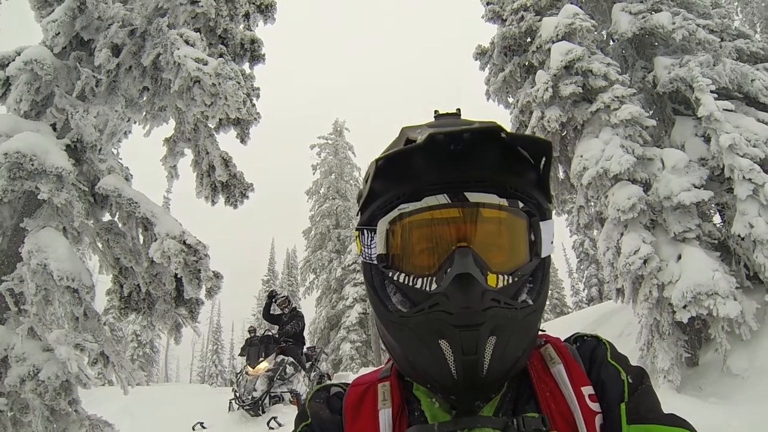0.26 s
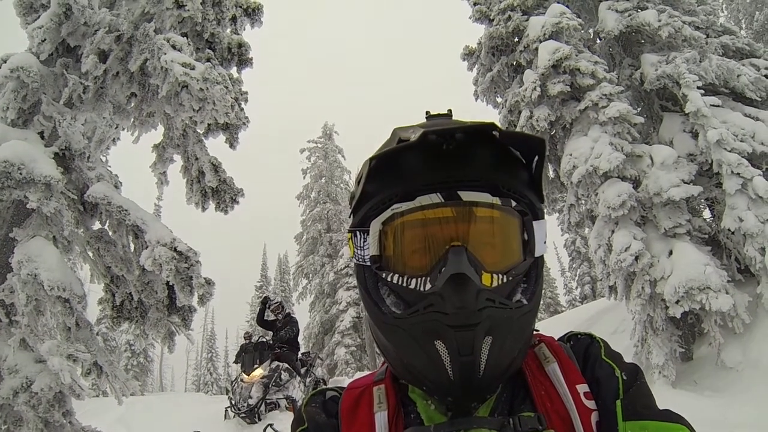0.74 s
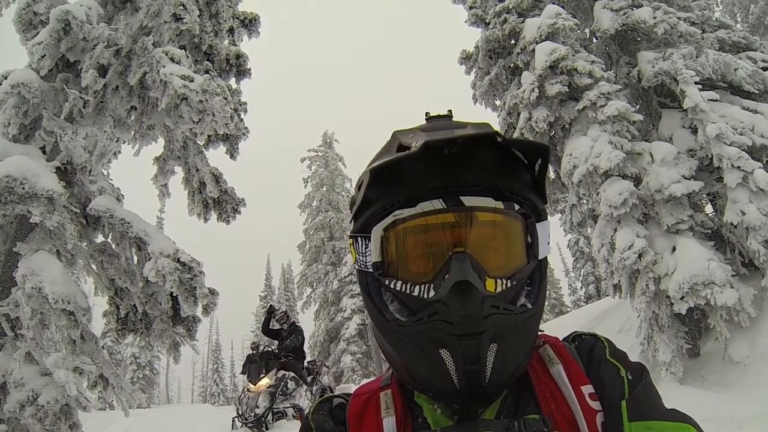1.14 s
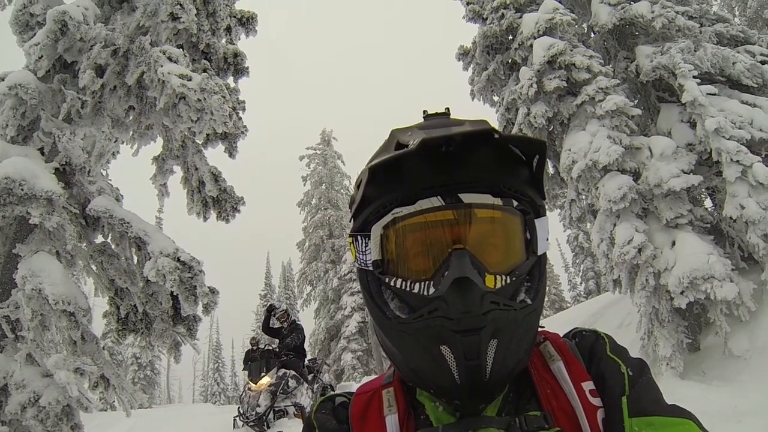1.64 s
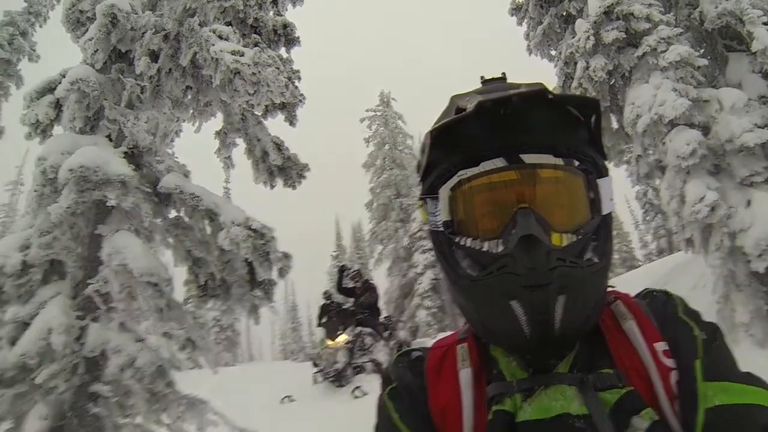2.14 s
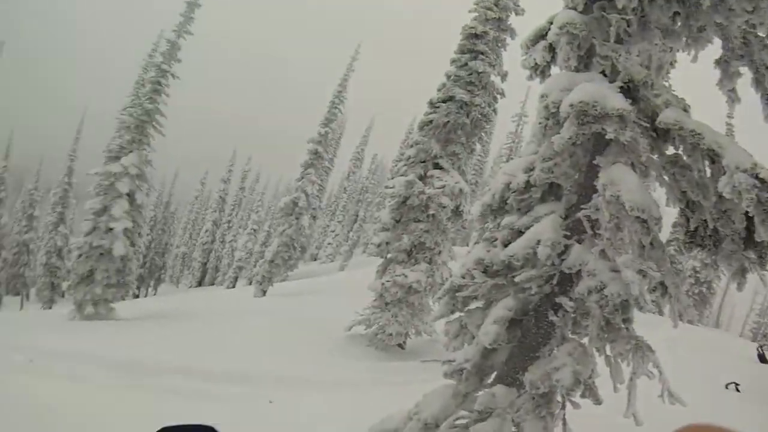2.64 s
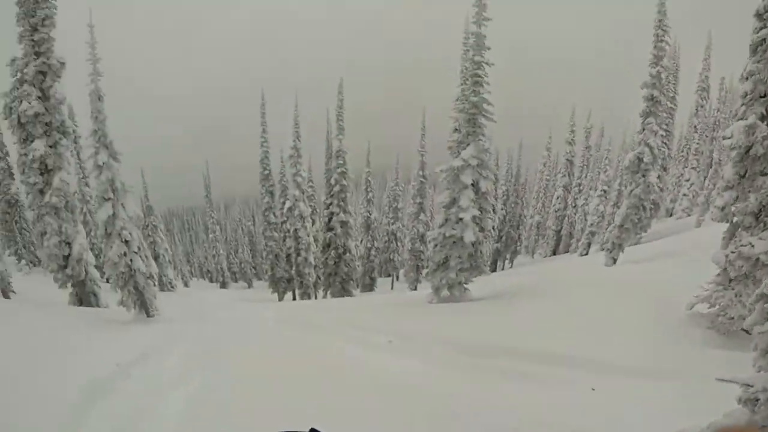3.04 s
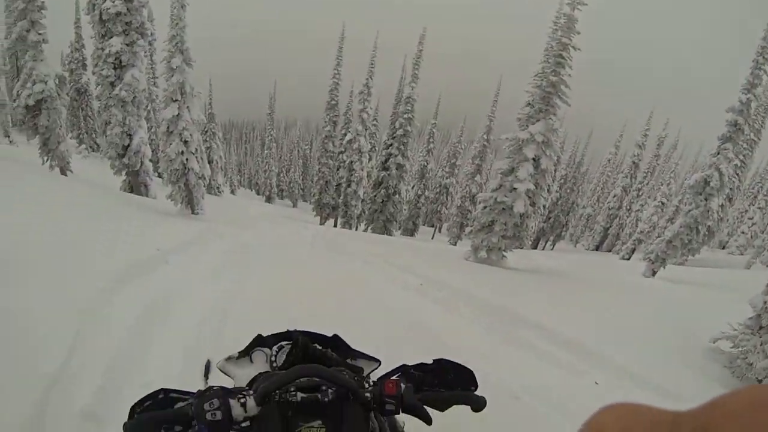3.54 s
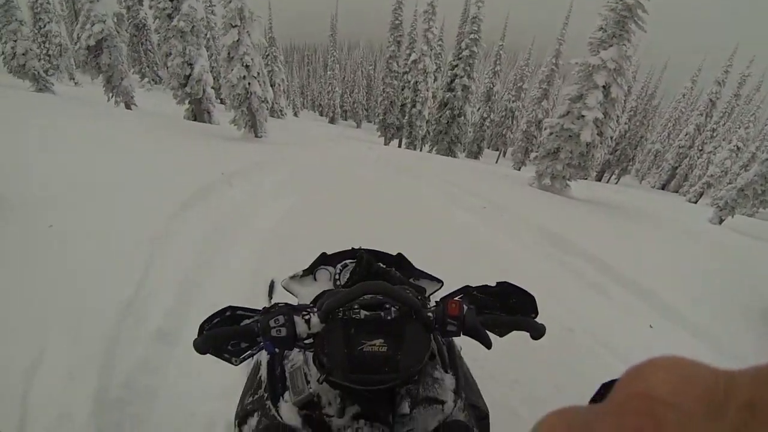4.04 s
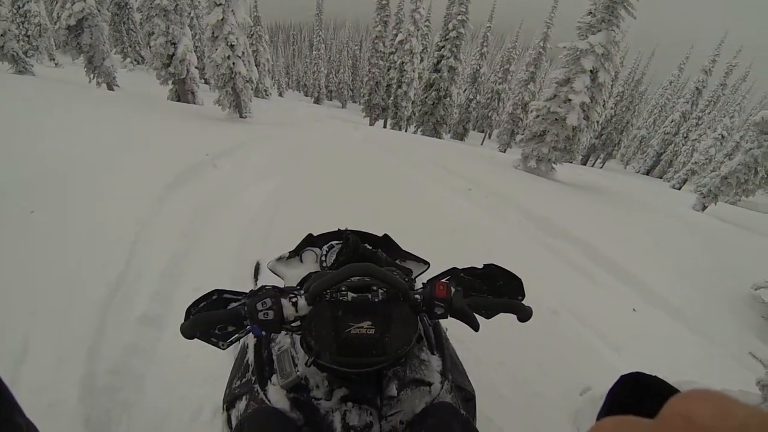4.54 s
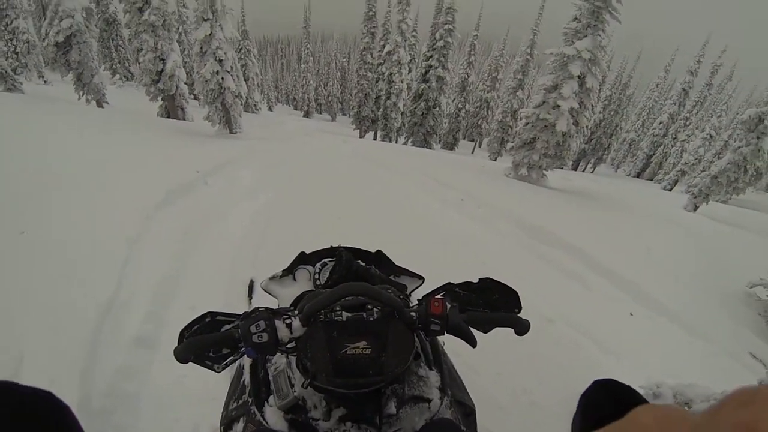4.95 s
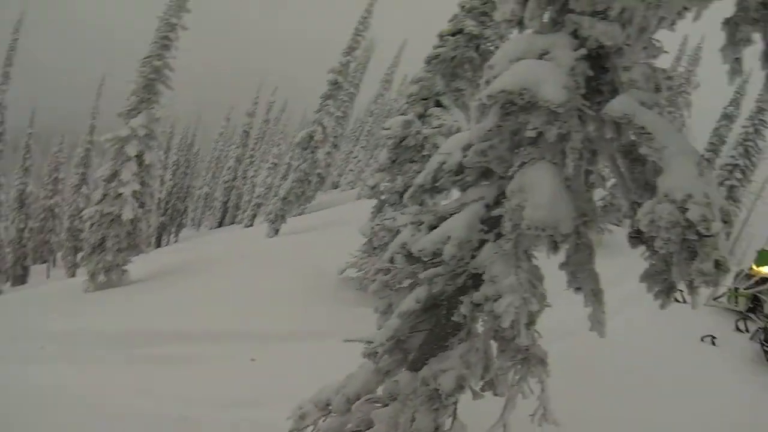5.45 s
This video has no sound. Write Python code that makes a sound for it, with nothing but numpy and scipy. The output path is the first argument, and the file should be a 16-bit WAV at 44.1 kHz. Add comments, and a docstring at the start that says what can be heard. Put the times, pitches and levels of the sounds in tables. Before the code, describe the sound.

A snowmobile idles with an uneven putter while close scrapes, clicks and hard knocks come from fingers handling the microphone.

```python
"""A two-stroke snowmobile putters at idle in deep snow, now and then firing fully; its block whirs.
Each firing is a short exhaust puff over a pipe hum. Heard from a small cased camera in the rider's hand:
mostly from 2 s on, fingers scrape and click on the case and thump its mount, hard enough to overload.
The camera's gain, a set curve, rises at the start, ducks after hard knocks and creeps back,
taking engine and background with it."""
import sys
import numpy as np
from scipy import signal
from scipy.fft import rfft, irfft
from scipy.io import wavfile
from scipy.ndimage import uniform_filter1d

SR = 44100
rng = np.random.default_rng(int(sys.argv[2]) if len(sys.argv) > 2 else 0)


def master_out(mix):
    """Clip the mix to full scale and print it as 16-bit PCM to the path in sys.argv[1]."""
    frames = np.transpose(np.atleast_2d(mix))
    ceiling = np.clip(frames, -1, 1)
    pcm = np.round(ceiling * 32767).astype(np.int16)
    wavfile.write(sys.argv[1], SR, pcm)


N = 250834
FIRING_HZ = 52.52

# camera gain on engine and background, ducks after hard knocks: t/s, level/dB
CAMERA_GAIN = [(0, -54), (.04, -49), (.055, -14), (.3, -11.5), (.5, -8), (.75, -5), (.95, -2), (2.28, -1.5),
               (2.33, 1), (2.4, -2.5), (2.7, 0.5), (3.31, -3), (3.35, -17), (3.47, -11.5), (3.6, -15),
               (3.65, -12), (3.86, -29), (3.9, -26), (4.0, -11), (4.13, -11.5), (4.22, -16), (4.29, -14.5),
               (4.45, -10.5), (4.84, -8), (4.9, -20.5), (5.02, -22), (5.12, -14.5), (5.3, -11.5),
               (5.69, -7.5)]
# full firings: t/s, level/dB
FULL_FIRINGS = [(.648, -29.5), (.743, -27.5), (.762, -31), (0.836, -26.5), (0.916, -31), (.935, -26),
                (0.953, -25.5), (1.071, -24), (1.126, -24), (1.184, -26), (1.26, -28), (1.277, -25.5),
                (1.335, -28), (1.393, -26.5), (1.449, -24), (1.544, -26), (1.564, -26), (1.638, -28),
                (1.695, -30), (1.714, -25), (1.789, -27), (1.829, -28), (1.886, -27.5), (1.905, -26),
                (1.98, -27), (2.06, -29.5), (2.077, -22), (2.134, -26), (2.21, -28), (2.463, -40),
                (2.497, -29), (2.629, -27.5), (2.707, -22), (2.861, -25.5), (2.937, -26.5), (3.037, -22.5),
                (3.13, -29), (3.207, -28.5), (3.263, -28)]
# pipe hum: multiple of firing rate, level/dB
PIPE_HARMONICS = [(2, -51), (3, -38.5), (4, -37), (5, -49), (6, -53.5)]
# engine clatter: f/Hz, density/dB
WHIR_SPECTRUM = [(250, 0.5), (440, -5), (620, -15), (1050, -13.5), (1300, -5.5), (1500, -3.5), (1800, -10),
                 (2100, -15.5), (2800, -23), (3350, -27), (5500, -33.5), (6600, -40), (9500, -43.5),
                 (15000, -44.5)]
# ringing metal parts: f/Hz, width/Hz, gain/dB
METAL_MODES = [(1310, 70, -4.5), (1470, 70, -7), (1620, 170, -9), (3210, 110, 1.5), (4000, 77, -13),
               (4910, 89, -4)]
# engine vibration through the rider: t/s, level/dB
SHAKE_LEVEL = [(0, -77), (3.2, -53), (3.7, -47.5), (4.0, -47.5), (4.7, -43), (5.05, -42.5), (5.2, -40),
               (5.29, -36), (5.345, -19.5), (5.41, -29.5), (5.47, -35), (5.52, -27.5), (5.62, -32.5),
               (5.69, -37.5)]
# finger slides: start/s, hardest/s, end/s, rub/dB, rasp/dB, hiss/dB, rumble/dB
SLIDES = [(0.048, 0.047, 0.07, -51, -51.5, -63, -41), (0.075, 0.095, 0.15, -53.5, -68, -84, -45.5),
          (0.272, 0.357, 0.44, -54, -59, -82, -43), (0.414, 0.433, 0.43, -55, -67, -83, -26.5),
          (2.06, 2.08, 2.147, -29.5, -42, -45, -37), (2.155, 2.16, 2.26, -34, -52, -49.5, -31),
          (2.201, 2.214, 2.326, -33, -38, -48, -31), (2.258, 2.307, 2.314, -22, -27, -46, -26),
          (2.358, 2.38, 2.53, -31, -55, -86, -36), (2.437, 2.476, 2.52, -26, -30.5, -51, -38),
          (2.474, 2.506, 2.445, -28, -48, -41, -41), (2.512, 2.533, 2.55, -37, -43, -48.5, -29.5),
          (2.546, 2.58, 2.646, -25, -34.5, -46.5, -27), (2.651, 2.723, 2.704, -26.5, -41, -48.5, -47),
          (2.713, 2.76, 2.805, -24.5, -33.5, -41.5, -22.5), (3.313, 3.313, 3.343, -19, -22.5, -44, -32),
          (3.45, 3.454, 3.6, -55, -54.5, -81, -39.5), (3.526, 3.593, 3.68, -46.5, -45.5, -56.5, -43),
          (3.65, 3.68, 3.83, -50.5, -72, -61.5, -44), (3.762, 3.77, 3.753, -24.5, -30, -49, -32),
          (3.772, 3.847, 3.9, -43, -52.5, -62, -40), (3.935, 4.065, 4.05, -52, -54.5, -61, -40.5),
          (4.12, 4.15, 4.155, -36.5, -42, -55, -38), (4.144, 4.162, 4.21, -30, -35.5, -41.5, -16.5),
          (4.31, 4.32, 4.39, -24.5, -27.5, -43, -18), (4.376, 4.399, 4.425, -34, -45, -49.5, -25.5),
          (4.454, 4.493, 4.5, -49, -49, -58.5, -31.5), (4.573, 4.605, 4.62, -44, -40, -51, -35),
          (4.69, 4.707, 4.8, -54, -64, -65.5, -35.5), (4.738, 4.772, 4.81, -48.5, -49, -68, -48),
          (4.827, 4.856, 4.96, -58, -63.5, -56.5, -37.5), (4.863, 4.883, 4.904, -23.5, -26, -42, -15),
          (5.08, 5.247, 5.38, -60, -55, -62, -37), (5.338, 5.355, 5.43, -41.5, -49, -56.5, -38)]
# rubbed wall, skin rasp, fine hiss, sharp slips: f/Hz, density/dB
RUB_SPECTRUM = [(150, -3), (400, -13.5), (750, -21), (1150, -10), (1520, 4), (1800, -6.5), (2400, -21.5),
                (4000, -33.5), (15000, -57)]
RASP_SPECTRUM = [(900, -20), (1600, 1.5), (2000, 2.5), (2350, 2.5), (2650, -3.5), (3200, -6.5),
                 (3800, -29.5), (6000, -40.5), (15000, -51)]
HISS_SPECTRUM = [(1500, -19), (2800, 5), (3400, 4.5), (4300, -3), (5700, -4.5), (7500, -14.5),
                 (10000, -15.5), (13000, -22), (15500, -22)]
SIZZLE_SPECTRUM = [(700, -0.5), (1500, 9), (2500, 7.5), (4000, 0), (6000, -3), (8500, 1), (12000, -3.5),
                   (14000, -7), (15500, -18.5)]
# single resonances freed by the grip: start/s, end/s, f/Hz, width/Hz, level/dB
GRIP_SQUEAKS = [(0.076, .19, 2000, 490, -62), (0.415, 0.449, 2040, 384, -48.5),
                (0.43, 0.44, 1080, 774, -54), (2.258, 2.284, 3200, 600, -36),
                (2.355, 2.446, 1800, 467, -36), (2.474, 2.504, 5100, 900.6, -39.5),
                (2.57, 2.609, 1940, 450, -27), (3.314, 3.331, 2670, 795, -28.5),
                (3.544, 3.612, 5400, 700, -63.5), (4.366, 4.418, 6660, 684, -59),
                (4.37, 4.418, 3850, 500, -47), (4.387, 4.422, 973, 200, -37),
                (4.874, 4.893, 2570, 590, -23.5), (5.21, 5.237, 640, 120, -55), (5.311, 5.39, 640, 90, -47),
                (5.42, 5.511, 607, 59.2, -53), (5.44, 5.518, 413, 71.5, -53.5)]
# hard contacts: t/s, ring level/dB, ring f/Hz, crack level/dB, crack decay/ms
CONTACTS = [(.357, -43, 1620, -44, 0.74), (.431, -36, 1480, -63, 0.87), (1.444, -40, 1510, -31, 0.31),
            (2.069, -21.5, 1300, -27.5, 2.2), (2.164, -23.5, 1590, -31.5, 1), (2.269, -33, 1580, -30, 3.3),
            (2.294, -11.5, 1510, -46, 1.8), (2.305, -18, 1610, -33, 2.5), (2.312, -3.5, 1569, -13.5, 1.9),
            (2.463, -10, 1465, -24, 0.75), (2.587, -15, 1600, -26.5, 3.6), (2.709, -21, 1461, -42, 0.99),
            (2.762, -31, 1550, -22, 1.7), (3.316, -33, 1520, -26.5, 3.2), (3.332, -13, 760, -6, 0.98),
            (3.341, -37, 1670, -46, 0.91), (3.348, -34, 1500, -45, 0.79), (3.364, -42, 1500, -50, 1),
            (3.46, -39, 1600, -44, 1.8), (3.6235, -3.5, 1590, -21.5, 1.4), (3.763, -22.5, 1500, -31.5, 5.5),
            (3.773, -16.5, 1500, -30, 1.3), (3.871, -10.5, 1600, -32, 1.2), (3.875, -0.5, 1990, -8, 0.95),
            (3.8759, -1, 1484, -18, 1.94), (4.02, -34, 1540, -30, 1.33), (4.04, -35, 1450, -38, 1.02),
            (4.069, -35, 1520, -31, 1.4), (4.136, -34, 1388, -48, 1.6), (4.1594, -5.5, 1446, -21.5, 1.6),
            (4.18, -11.5, 1320, -19, 1.074), (4.362, -13.5, 1440, -40, 1.9), (4.402, -18, 1680, -30.5, 1.3),
            (4.811, -55, 1443, -40.5, 2.6), (4.865, -4.5, 1926, -14, 1.702),
            (4.8671, -1.5, 1530, -8.5, 0.85), (4.894, -6.5, 1335, -20.5, 1.4), (4.905, -40, 1500, -42, 1.8),
            (4.947, -3.5, 1480, -13.5, 1.9), (4.949, -22, 1491, -21.5, 1.2),
            (5.058, -42.5, 1470, -50, 1.22), (5.076, -41, 1460, -51, 1.1), (5.217, -35.5, 1417, -49, 1.6),
            (5.299, -42, 1713, -46, 2.2), (5.324, -31.5, 1670, -27, 1.94), (5.363, -32, 1471, -22.5, 0.43),
            (5.507, -39, 1530, -44, 1.6)]
# struck case: f/Hz, density/dB
CRACK_SPECTRUM = [(200, 2.5), (750, -3.5), (1500, -15.5), (2400, 0.5), (3100, -4.5), (3800, -7.5),
                  (4700, -14.5), (6000, -17), (8000, -25.5), (12000, -32), (15500, -50.5)]
# high case modes: f/Hz, width/Hz, gain/dB
CASE_MODES = [(732, 70, -4), (1940, 270, 0), (2430, 160, -2.5), (4860, 230, -4)]
# blunt blows on the case: t/s, level/dB
BLOWS = [(2.312, -25), (2.762, -12), (3.314, -14), (3.332, -7.5), (3.775, -17.5), (3.870, -28),
         (3.879, -16.5), (4.153, -21.5), (4.162, -13.5), (4.18, -32), (4.195, -19.5), (4.335, -23),
         (4.404, -24.5), (4.893, -0.5), (4.949, -8.5), (5.356, -28.5)]
# low modes of the case hollow: f/Hz, level/dB, t60/s
HOLLOW_MODES = [(196, 1.5, 0.038), (270, 1.5, .03), (413, -1, .018), (578, -9.5, 0.013), (1032, -2, 0.022)]
# bumps on the mount: t/s, signed amplitude, f/Hz, t60/s
MOUNT_BUMPS = [(2.312, 0.57, 43.3, 0.042), (2.596, -0.29, 25.2, 0.23), (2.762, 0.27, 55, 0.098),
               (3.320, 0.41, 60.4, 0.071), (3.3313, 1.77, 84.7, 0.037), (3.346, 0.15, 72, 0.15),
               (3.6255, -0.53, 96.3, 0.097), (3.707, 0.073, 84.9, 0.099), (3.773, 0.099, 129, 0.014),
               (3.810, 0.18, 103, 0.052), (3.868, -0.72, 93, 0.04), (3.881, -0.67, 112, 0.044),
               (4.150, -0.57, 72, 0.045), (4.160, 0.63, 67.1, 0.19), (4.197, 0.53, 85.1, 0.033),
               (4.322, 0.18, 27.8, 0.22), (4.336, -0.32, 59.53, 0.077), (4.581, 0.18, 35.5, .09),
               (4.616, .1, 79.4, 0.23), (4.811, -0.31, 74, 0.11), (4.888, -0.16, 126, 0.017),
               (4.8922, 0.56, 52.5, 0.098), (4.9028, -1.2, 107, 0.032), (4.952, -0.41, 102.6, 0.13),
               (5.147, -0.098, 70.02, 0.094), (5.462, 0.062, 30, 0.17), (5.526, -0.08, 65, 0.21)]


def undb(db):
    """dB to gain."""
    return 10 ** (np.asarray(db) / 20)


def clock():
    """Sample times in s."""
    return np.arange(N) / SR


def envelope(rows):
    """Gain along (t/s, level/dB) rows."""
    return undb(np.interp(clock(), *np.transpose(rows)))


def unit_rms(x):
    """Scale to rms 1."""
    return x / np.sqrt(np.mean(x ** 2))


def resonate(x, hz, width_hz):
    """One resonance, gain 1 at centre."""
    return signal.lfilter(*signal.iirpeak(hz, hz / width_hz, fs=SR), x)


def band(x, first_hz, second_hz):
    """Two (centre, width) resonances in series, rms 1."""
    return unit_rms(resonate(resonate(x, *first_hz), *second_hz))


def ringing(x, modes):
    """Input plus the modes it excites."""
    return x + sum(undb(db) * resonate(x, hz, width_hz) for hz, width_hz, db in modes)


def colour(x, spectrum, size=2048):
    """Minimum-phase filter of unit power, shaped by (f/Hz, density/dB) rows."""
    hz, db = np.transpose(spectrum)
    bins_hz = np.maximum(np.fft.rfftfreq(size, 1 / SR), 1)
    gain = undb(np.interp(np.log(bins_hz), np.log(hz), db)) * np.minimum(bins_hz / hz[0], 1)
    cepstrum = irfft(np.log(gain))
    cepstrum[1:size // 2] *= 2
    cepstrum[size // 2 + 1:] = 0
    response = irfft(np.exp(rfft(cepstrum)))
    return signal.fftconvolve(x, response / np.linalg.norm(response))[:N]


def wander(rate_hz):
    """Ramps between random values."""
    knots = rng.standard_normal(int(N / SR * rate_hz) + 2)
    return 0.91 * np.interp(clock() * rate_hz, np.arange(len(knots)), knots)


def slips(rate_hz, spread_db):
    """Random impulses of unequal size, rms 1."""
    sizes = undb(spread_db * np.minimum(rng.exponential(size=N), 4))
    return unit_rms((rng.random(N) < rate_hz / SR) * sizes * rng.standard_normal(N))


def pulses(times_s, sizes):
    """One impulse per time."""
    return np.bincount(np.clip(times_s * SR, 0, N - 1).astype(int), sizes, N)


def firings(jitter_s=0.00076):
    """Uneven firing times between the full firings, and the indices of the full ones."""
    marks_s = np.r_[0, [s for s, _ in FULL_FIRINGS], N / SR]
    turns = np.maximum(np.round(np.diff(marks_s) * FIRING_HZ), 1)
    count = np.r_[0, np.cumsum(turns)].astype(int)
    late_s = jitter_s * np.clip(rng.standard_normal(count[-1]), -2, 2)
    late_s[count[:-1]] = 0
    return np.interp(np.arange(count[-1]), count, marks_s) + late_s, count[1:-1]


def exhaust(times_s, full, gain, weak_db=-39, scatter_db=4, puff_hz=208, puff_s=0.0023,
            answer_db=-9, answer_s=0.01, waver_db=2):
    """The silencer rounds each firing to a puff, answered half a turn later; the pipe hums below."""
    scatter = np.clip(rng.standard_normal((len(times_s), 2)), -2, 1.3).T
    weak, answer = undb(weak_db + scatter_db * scatter) * np.interp(times_s, clock(), gain)
    strength = weak.copy()
    strength[full] = undb([db - 1.5 for _, db in FULL_FIRINGS])
    kicks = pulses(times_s, strength) + pulses(times_s + answer_s, undb(answer_db) * answer)
    t = np.arange(-512, 513) / SR
    puff = np.exp(-((t - .001) / puff_s) ** 2) * np.cos(2 * np.pi * puff_hz * t)
    puffs = signal.fftconvolve(kicks, puff, "same")
    turn = np.interp(clock(), times_s, np.arange(len(times_s)))
    hum = sum(undb(db + waver_db * wander(14)) * np.cos(2 * np.pi * round(k) * turn)
              for k, db in PIPE_HARMONICS)
    # hum swells around each full firing
    surge = np.interp(clock(), times_s, uniform_filter1d(strength / weak, size=3)) ** 0.32
    return puffs + gain * surge / surge.mean() * hum


def whir(times_s, level_db=-43, flicker_db=1.94):
    """Pistons, clutch and fan: dense clatter, partly repeating each turn, rings metal parts."""
    smooth_s = uniform_filter1d(times_s, size=5, mode="nearest")
    turn = np.interp(clock(), smooth_s, np.arange(len(times_s)))
    one_turn = rng.standard_normal(int(SR / FIRING_HZ))
    repeating = one_turn[(turn % 1 * len(one_turn)).astype(int)]
    clatter = (rng.standard_normal(N) + repeating) * undb(flicker_db * wander(60))
    return undb(level_db) * unit_rms(ringing(colour(clatter, WHIR_SPECTRUM), METAL_MODES))


def shake(times_s, scatter=0.73, octave_db=-14, rumble_db=-4):
    """Firings rock the mount, resonant near twice their rate; the arm adds rumble."""
    kicks = pulses(times_s, 1 + scatter * rng.standard_normal(len(times_s)))
    hum = band(kicks, (106, 35), (120, 74))
    octave = band(kicks, (208, 40), (208, 100))
    rumble = band(rng.standard_normal(N), (29, 34), (32, 78))
    return envelope(SHAKE_LEVEL) * (hum + undb(octave_db) * octave + undb(rumble_db) * rumble)


def scrapes(rub_db=.5, rasp_db=-.5, judder_db=2, spread_db=2.5, sizzle_db=-1):
    """Skin sticks and slips on plastic: the wall rings, the surface rasps and hisses, the case drags."""
    t, force = clock(), np.zeros((4, N))
    for start_s, hardest_s, end_s, *levels_db in SLIDES:
        span = slice(int(start_s * SR), int(end_s * SR))
        press = np.interp(t[span], [start_s, hardest_s, end_s], [0, 1, 0])
        force[:, span] += undb(levels_db)[:, None] * (0.14 + 0.95 * press ** 1.35)
    rub, rasp, hiss, rumble = uniform_filter1d(force, size=90, axis=1)
    judder = undb(judder_db * wander(220))
    layers = ((undb(rub_db) * rub, RUB_SPECTRUM), (undb(rasp_db) * rasp, RASP_SPECTRUM),
              (hiss, HISS_SPECTRUM))
    friction = sum(gain * unit_rms(colour(judder * slips(3000, spread_db), spectrum))
                   for gain, spectrum in layers)
    # only a hard grip breaks loose in sharp slips
    grip = np.tanh(rub / undb(-25))
    sizzle = hiss * grip * unit_rms(colour(slips(860, 2.8), SIZZLE_SPECTRUM))
    drag = band(rng.standard_normal(N), (28, 60), (36, 120))
    return friction + undb(sizzle_db) * sizzle + rumble * drag


def squeaks():
    """Rapid slips briefly feed one case resonance."""
    out = np.zeros(N)
    for start_s, end_s, hz, width_hz, db in GRIP_SQUEAKS:
        squeak = band(slips(6000, 1.7), (hz, width_hz), (hz, 2 * width_hz))
        progress = np.clip((clock() - start_s) / (end_s - start_s), 0, 1)
        out += undb(db) * squeak * np.sin(np.pi * progress) ** .5
    return out


def clicks(swell_s=0.00085, tail_db=-27, tail_s=0.0035, crack_gain_db=2, contact_s=0.00045):
    """A brief crack rings the air in the case; the ring swells and dies."""
    ring, crack = np.zeros(N), np.zeros(N)
    t = np.arange(SR // 16) / SR
    swell = (t / swell_s * np.exp(1 - t / swell_s)) ** 1.17 + undb(tail_db) * np.exp(-t / tail_s)
    attack = 1 - np.exp(-t / contact_s)
    for start_s, ring_db, hz, crack_db, decay_ms in CONTACTS:
        span = slice(int(start_s * SR), int(start_s * SR) + len(t))
        ring[span] += undb(ring_db) * swell * np.sin(2 * np.pi * hz * t)
        grit = rng.standard_normal(len(t))
        crack[span] += undb(crack_db) * grit * attack * np.exp(-1000 * t / decay_ms)
    return ring + undb(crack_gain_db) * ringing(colour(crack, CRACK_SPECTRUM), CASE_MODES)


def knocks():
    """Blunt blows ring the hollow of the case."""
    t = np.arange(SR // 10) / SR
    ring = sum(undb(db - 60 * t / t60_s) * np.sin(2 * np.pi * hz * t) for hz, db, t60_s in HOLLOW_MODES)
    times_s, levels_db = np.transpose(BLOWS)
    return signal.fftconvolve(pulses(times_s, undb(levels_db)), ring / np.abs(ring).max())[:N]


def thumps(contact_s=0.00032):
    """The camera swings on its mount; tighter grip, higher note."""
    out, t = np.zeros(N), np.arange(SR // 7) / SR
    attack = 1 - np.exp(-t / contact_s)
    for start_s, swing, hz, t60_s in MOUNT_BUMPS:
        span = slice(int(start_s * SR), int(start_s * SR) + len(t))
        out[span] += swing * attack * undb(-60 * t / t60_s) * np.sin(2 * np.pi * hz * t)
    return out


def sway(level_db=-41, gust_db=3):
    """Soft rumble of air and the unsteady hand."""
    gusts = undb(level_db + gust_db * wander(2.4))
    return gusts * band(rng.standard_normal(N), (22, 33), (26, 110))


def whine(hz=11430, width_hz=260, burst_hz=60, level_db=-77):
    """Camera electronics whistle faintly in bursts."""
    gate = np.sin(2 * np.pi * burst_hz * clock()) > 0
    return undb(level_db) * band(gate * rng.standard_normal(N), (hz, width_hz), (hz, 2 * width_hz))


def scene():
    """Engine, handling, background. Mono and dry: snow swallows the echoes."""
    times_s, full = firings()
    gain = envelope(CAMERA_GAIN)
    engine = exhaust(times_s, full, gain) + gain * whir(times_s) + shake(times_s)
    handling = scrapes() + squeaks() + clicks() + knocks() + thumps()
    background = gain * (sway() + whine())
    return (engine + handling + background)[None]


def record(dry):
    """Overload on the hardest knocks, then a steep low-pass."""
    cutoff_hz = 15200
    lowpass = signal.ellip(8, .2, 70, cutoff_hz, fs=SR, output="sos")
    return signal.sosfilt(lowpass, np.clip(dry, -1, 1))


dry = scene()
out = record(dry)
master_out(out)
```